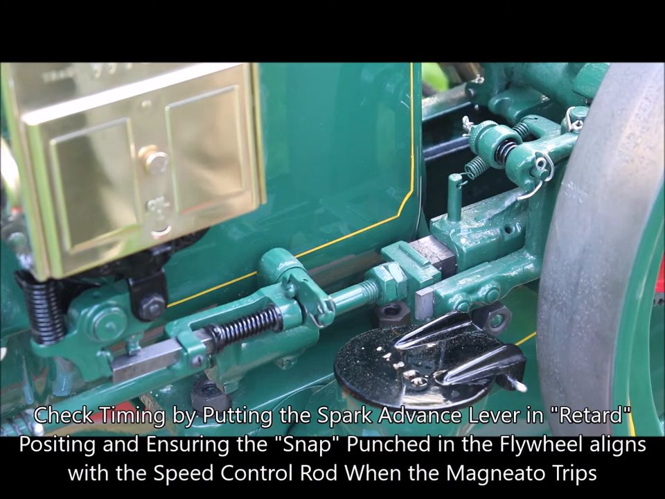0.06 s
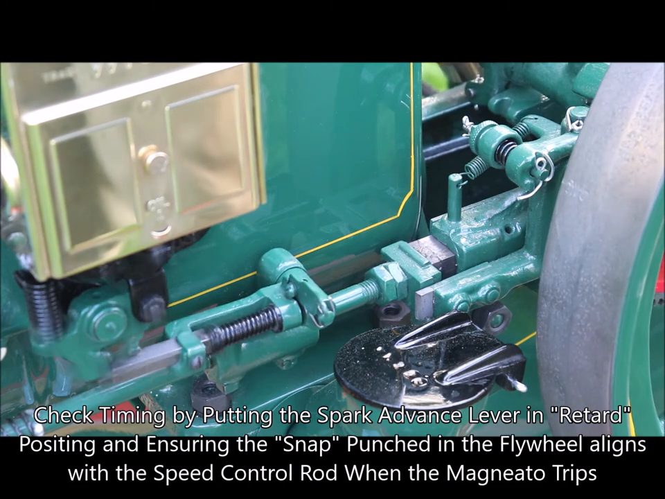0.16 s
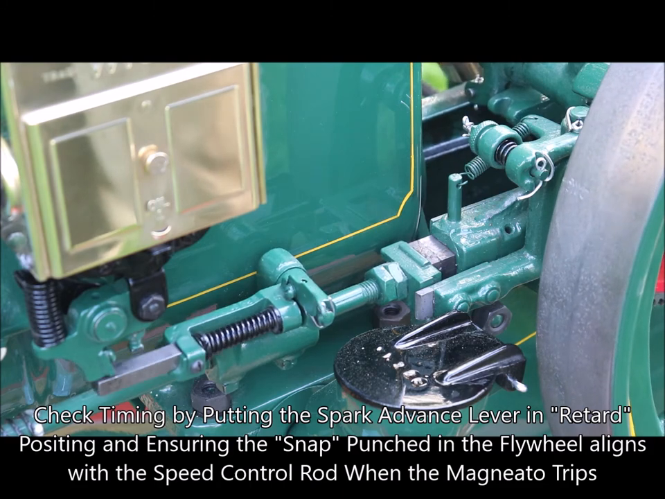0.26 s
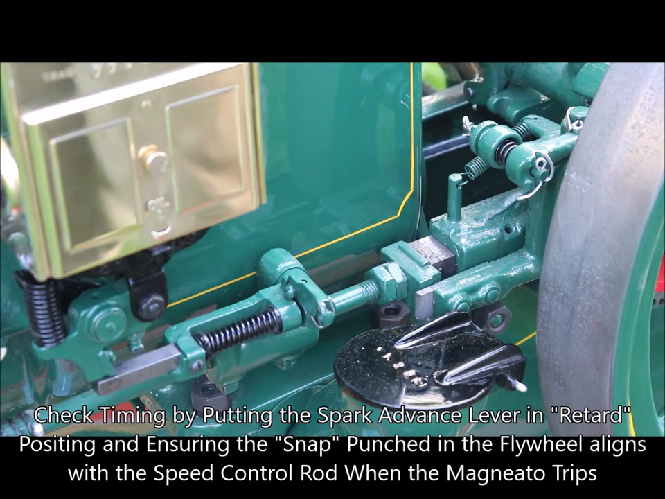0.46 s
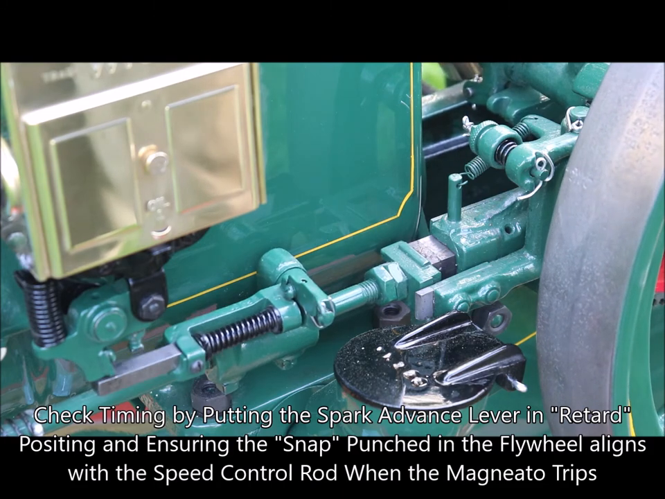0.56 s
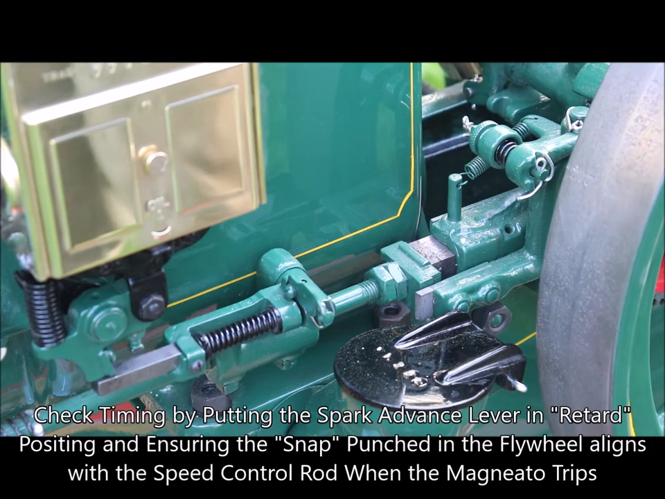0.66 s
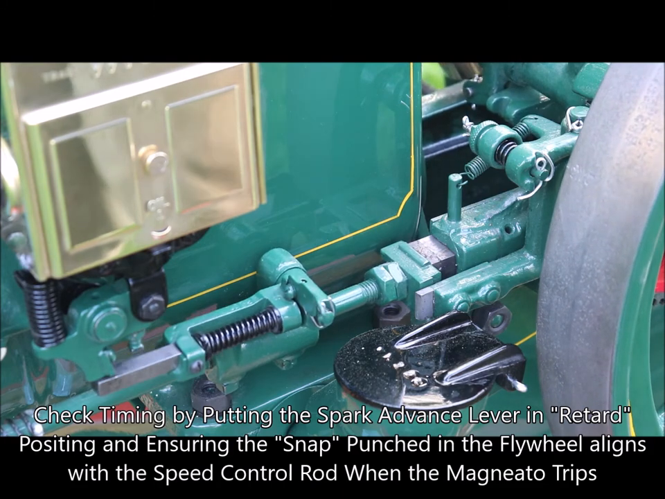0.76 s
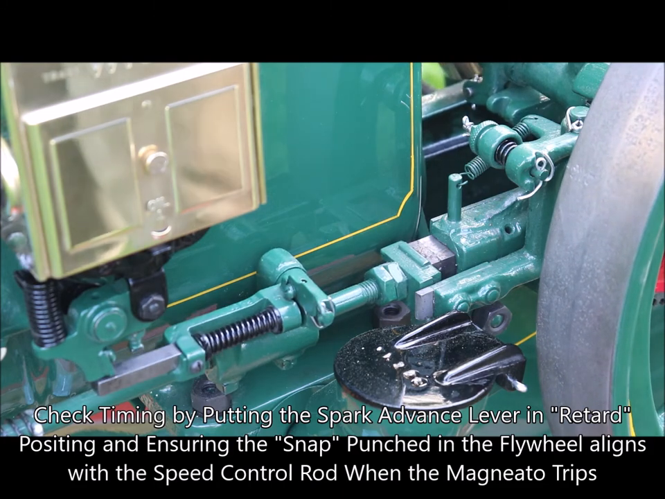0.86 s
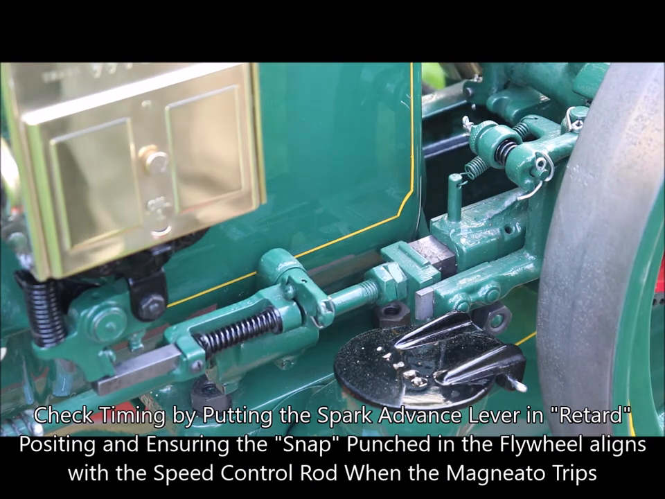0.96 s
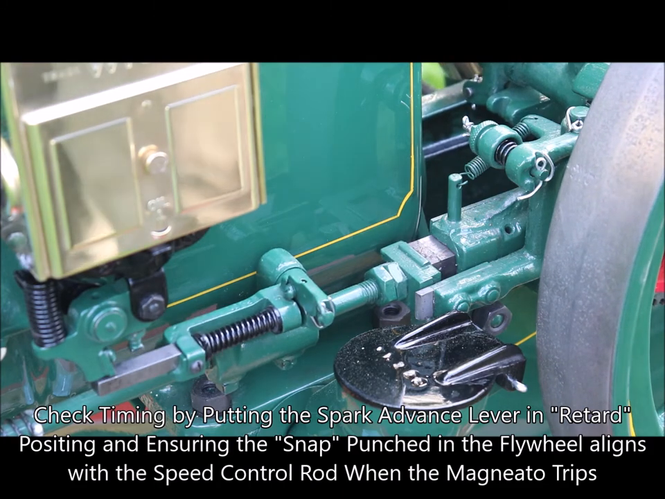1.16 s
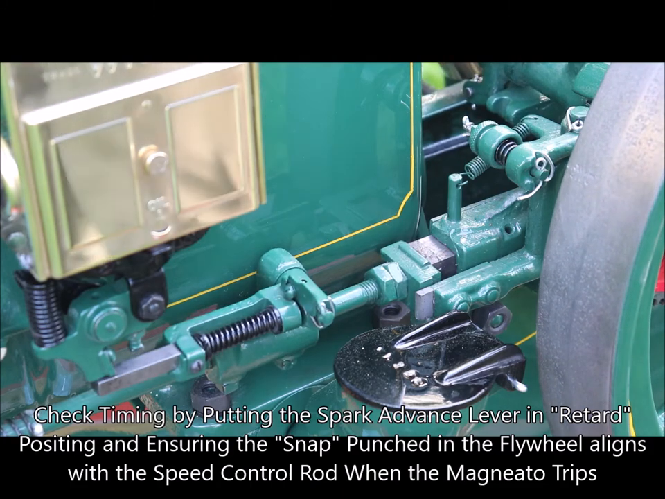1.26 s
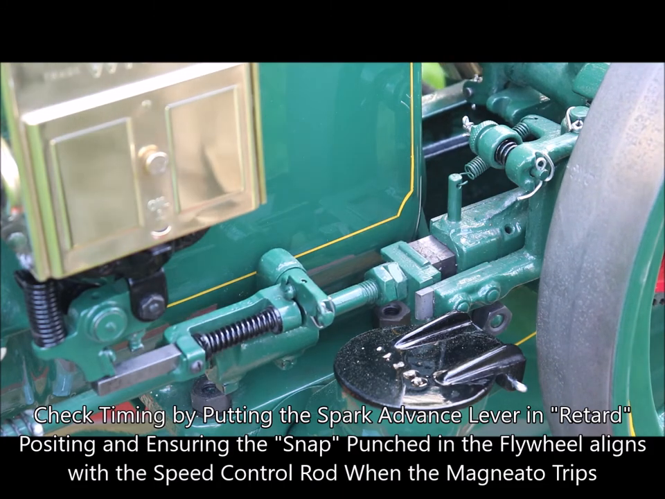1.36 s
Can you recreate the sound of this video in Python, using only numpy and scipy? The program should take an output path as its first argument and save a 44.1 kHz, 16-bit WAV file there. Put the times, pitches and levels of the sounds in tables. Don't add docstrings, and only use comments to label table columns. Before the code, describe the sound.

Sharp steel snap of a sprung engine ignition trip, heavy thud beneath, brief ring dying into quiet air

```python
import sys
import numpy as np
from scipy import signal
from scipy.fft import rfft, irfft, next_fast_len
from scipy.io import wavfile
from scipy.ndimage import uniform_filter1d, map_coordinates

SR = 44100
rng = np.random.default_rng(int(sys.argv[2]) if len(sys.argv) > 2 else 0)


def nominal_scale(level):
    x = np.asarray(level, float) / 20
    return 10 ** x


def master_out(mix):
    frames = np.transpose(np.atleast_2d(mix))
    ceiling = np.clip(frames, -1, 1)
    pcm = np.round(ceiling * 32767).astype(np.int16)
    wavfile.write(sys.argv[1], SR, pcm)


N = 61739
SIDES = np.array([[1], [-1]])


def unit(x):
    return x / np.sqrt(np.mean(x ** 2) + 1e-20)


def along(points, hz):
    f, v = np.transpose(points)
    return np.interp(np.log(hz + 1), np.log(f + 1), v)


def wobble(rate):
    return map_coordinates(rng.standard_normal(int(N * rate / SR) + 4), [np.arange(N) * rate / SR])


def filtered(x, response):
    m = next_fast_len(N + SR // 2)
    return irfft(rfft(x, m) * response(np.fft.rfftfreq(m, 1 / SR)), m)[..., :N]


def rush(gain, alike, patchy_db):
    z = signal.stft(rng.standard_normal((2, N)), nperseg=512)[2]
    field = uniform_filter1d(rng.standard_normal(z.shape[1:]), size=6, axis=0)
    field = uniform_filter1d(field, size=10, axis=1)
    pair = signal.istft(z * nominal_scale(patchy_db * unit(field)), nperseg=512)[1][:, :N]

    def mid_side_gain(hz):
        turn = np.arccos(np.clip(along(alike, hz), -1, 1)) / 2
        return gain(hz) * [np.cos(turn), np.sin(turn)]

    mid, side = filtered(pair, mid_side_gain)
    return unit(np.array([mid + side, mid - side]))


def tail(t60s, rise_s):
    hz, t, z = signal.stft(rng.standard_normal((2, SR // 2)), SR, nperseg=128)
    wide = (hz / (hz + 1500))[:, None]
    z = np.array([z[0] + wide * z[1], z[0] - wide * z[1]]) / np.sqrt(1 + wide ** 2)
    envelope = nominal_scale(-60 * t / along(t60s, hz)[:, None]) * (1 - np.exp(-t / rise_s))
    decay = signal.istft(z * envelope, SR, nperseg=128)[1]
    return decay / np.linalg.norm(decay[0])


def air():
    # f/Hz, level/dB per Hz
    floor_tone = [(15, -67), (25, -18.5), (102, -3), (166, -14.5), (242, -12.5), (270, -15.5), (641, -15),
                  (1260, -22.5), (16000, -42)]
    # f/Hz, left-right likeness
    floor_alike = [(60, .97), (240, .9), (950, .5), (3800, .25), (15000, .25)]
    # f/Hz, width/Hz, level/dB
    drones = [
        (104, 22, -61.5),
        (246, 58, -60),
    ]
    out = nominal_scale(-50.5 + .7 * wobble(8.9)) * rush(lambda hz: nominal_scale(along(floor_tone, hz)), floor_alike, patchy_db=1.4)
    for hz, width_hz, db in drones:
        drone = rush(lambda f: 1 / (1 + (2 * (f - hz) / width_hz) ** 2), [(100, 0.82)], patchy_db=1.2)
        out = out + nominal_scale(db + 1.8 * wobble(5.5)) * drone
    return out


def rustle():
    # t/s, level/dB, fizz over body/dB
    strokes = [
        (0.551, -78.5, 19),
        (.66, -61, -6),
        (.72, -69, -2),
        (.98, -65.5, 2),
        (1.06, -53.5, -6.5),
        (1.15, -54, -1.5),
        (1.21, -60, -2),
        (1.27, -58, -0.5),
        (1.4, -55.5, 1),
    ]
    # f/Hz, level/dB
    body_tone = [(500, -8.5), (900, -11), (2500, -5), (3500, -12.5), (6000, -31)]
    fizz_tone = [(2500, -15), (4200, -0.5), (5000, 0), (9000, -0.5), (11000, -6.5), (13000, -21)]
    pan_db, lag_s, body_db = -4.5, .00016, -4
    s, db, over_db = np.transpose(strokes)
    t = np.arange(N) / SR
    level_db, fizz_db = np.interp(t, s, db), np.interp(t, s, over_db)
    alike = [(1000, 0.82), (8000, 0.28)]
    body = rush(lambda hz: nominal_scale(along(body_tone, hz)), alike, patchy_db=0.8)
    fizz = rush(lambda hz: nominal_scale(along(fizz_tone, hz)), alike, patchy_db=0.8)
    rub = nominal_scale(level_db + wobble(30)) * (nominal_scale(body_db - fizz_db) * body + nominal_scale(fizz_db / 2) * fizz)
    return filtered(rub, lambda f: nominal_scale(pan_db * SIDES / 2) * np.exp(-1j * np.pi * f * lag_s * SIDES))


def yard(x):
    # f/Hz, t60/s
    wall_t60 = [(200, 0.29), (1500, 0.37), (5000, 0.32), (12000, 0.11)]
    near_t60 = [(300, 0.388), (1200, 0.38), (3000, 0.22), (12000, 0.076)]
    # f/Hz, level/dB
    echo_tone = [(150, -16), (400, 1.5), (3000, -1.5), (8000, -7.5), (15000, -27)]
    echo_s, echo_rise_s = .09, .07
    near_db, echo_db = -14.5, -26.5
    mono = x.mean(0)
    near = signal.fftconvolve(mono[None], tail(near_t60, rise_s=0.001), axes=1)[:, :N]
    late = np.pad(mono, (round(echo_s * SR), 0))
    far = signal.fftconvolve(late[None], tail(wall_t60, echo_rise_s), axes=1)[:, :N]
    return nominal_scale(near_db) * near + nominal_scale(echo_db) * filtered(far, lambda hz: nominal_scale(along(echo_tone, hz)))


def frame():
    # f/Hz, level/dB, t60/s
    hum_modes = [(230.6, -23, 0.23), (254.6, -27, 0.66), (326, -27.5, 0.25), (354.5, -37, 0.6),
                 (379.7, -32, 0.65), (434, -38.5, 0.42), (554, -41.5, 0.63), (725, -37, 0.26),
                 (938.3, -49.5, 0.74), (1446, -42, 0.35), (1626, -53, 1.46), (1780, -52.5, 1.1),
                 (3040, -53, 1.9), (3130, -51, 0.73)]
    # f/Hz, level/dB, t60/s
    thud_modes = [
        (240, -31, 0.11),
        (323, -21.5, 0.034),
        (471, -23.5, 0.031),
    ]
    strike_s, rise_s, thud_s = .228, 0.029, .2215
    t = np.clip(np.arange(N) / SR - strike_s, 0, None)
    since_thud = np.clip(np.arange(N) / SR - thud_s, 0, None)
    out = np.zeros((2, N))
    for hz, db, t60 in thud_modes:
        out += nominal_scale(db - 60 * since_thud / t60) * np.sin(2 * np.pi * hz * since_thud)
    for hz, db, t60 in hum_modes:
        uneven_db = 3.5 * wobble(20)
        drift = .045 * (hz / 400) ** .3 * wobble(30)
        shake = nominal_scale(db + uneven_db - 60 * t / t60) * (1 - np.exp(-t / rise_s))
        apart = hz / 5000 * rng.normal() * SIDES
        out += shake * np.sin(2 * np.pi * (hz * t + rng.random() + drift) + apart)
    return filtered(out, lambda f: (1j * f / (130 + 1j * f)) ** 3)


def trip():
    # t/s, level/dB, brightness/dB per octave, fullness below the knee/dB
    contacts = [(.2208, -31, -9, -18), (.2219, -12, -3, 6.5), (.2233, -12.5, 1.5, 4), (.2243, -9, 1.5, -11),
                (.2256, -12.5, -3.5, 0), (.2295, -14, 6.5, -3), (0.2299, -16.5, 7, -6),
                (.2337, -31.5, 9, -8), (.2358, -21.5, 5.5, 6), (.2484, -10, 3, -6),
                (.2491, -10.5, -4.5, -14.5), (.2525, -16.5, 5, 3.5), (.2594, -17, 5, -1),
                (0.2614, -10, 0.5, -5.5), (.2630, -14.5, 3.5, 1.5), (0.265, -14, -8.5, -6),
                (.2685, -20.5, -8, 4.5), (.2735, -24, 0.5, -11), (.2780, -19.5, -6, -1.5),
                (.2850, -46, 8.5, -4), (.5670, -47, -1, -6.5), (.5900, -49.5, 3, -14)]
    # f/Hz, level/dB, t60/s
    steel = [(661, -10.5, .012), (726.6, -12.5, 0.032), (1337, -5.5, 0.056), (1545, -1.5, 0.017),
             (2160, -13, 0.013), (2393, -5, 0.05), (2596, -0.5, .015), (3513, -4, 0.018),
             (5030, -8.5, 0.0075), (6230, -8, 0.011), (7540, -15, 0.021), (8660, -15, 0.019),
             (10640, -15.5, 0.013), (13600, -8.5, 0.004)]
    # f/Hz, level/dB
    crack_tone = [(200, -14), (600, 3.5), (1400, 2), (2600, 1), (4500, -4), (8000, -4.5), (11000, -13.5),
                  (15000, -14)]
    knee_hz, pivot_hz = 1800, 2500
    crack_db, crack_t60_s = 5.5, 0.0086
    rattle_db, rattle_t60_s, rattle_top_hz = -2.5, .06, 4500
    headroom_db, pan_db, lag_s = -4, -1, .000022
    out = np.zeros((2, 2, N + SR))
    t = np.arange(8192) / SR
    f = np.fft.rfftfreq(len(t), 1 / SR)
    hz, level_db, t60 = np.transpose(steel)[:, :, None]
    for s, db, tilt_db, full_db in contacts:
        def shade(v):
            bright = tilt_db * np.log2(np.maximum(v, knee_hz) / pivot_hz)
            return bright + full_db / (1 + (v / knee_hz) ** 4)

        level_draw, side_draw, pitch_draw, phase_draw = rng.standard_normal((4, len(steel), 1))
        spread = np.clip(hz / 7000, 0, 1.2) * side_draw * SIDES[:, None]
        phase = 2 * np.pi * hz * (1 + .012 * pitch_draw) * t + spread + .6 * phase_draw
        ring = nominal_scale(level_db + shade(hz) + 2 * level_draw - 60 * t / t60) * np.sin(phase)

        noise = rng.standard_normal((2, len(t)))
        width = [1 + 0 * f, f / (f + 2500)]
        mid, side = irfft(rfft(noise) * nominal_scale(along(crack_tone, f) + shade(f)) * width)
        spit = mid + .9 * SIDES * side
        dull = irfft(rfft(spit) / (1 + (f / rattle_top_hz) ** 2))
        crack = spit * nominal_scale(crack_db - 60 * t / crack_t60_s)
        rattle = dull * nominal_scale(rattle_db - 60 * t / rattle_t60_s)

        hit = np.array([ring.sum(1), crack + rattle]) * (1 - np.exp(-t / 0.0001))
        out[..., round(s * SR):][..., :len(t)] += nominal_scale(db + headroom_db + pan_db * SIDES / 2) * hit
    return filtered(out[..., :N], lambda f: (1j * f / (250 + 1j * f)) ** 3 * np.exp(1j * np.pi * f * lag_s * SIDES))


def scene():
    (ring, crack), hum = trip(), frame()
    return ring + crack + hum + yard(crack + 0.26 * ring + 3.54 * hum) + air() + rustle()


def low_pass(x):
    return signal.sosfilt(signal.butter(12, 16610, fs=SR, output="sos"), x)


def record(dry):
    duck_db, duck_from_s, duck_in_s, duck_back_s = -2.5, .27, 0.022, 0.047
    ceiling, top_hz = 1.05, 15850
    t = np.arange(N) / SR - duck_from_s
    duck = np.exp(-np.clip(t, 0, None) / duck_back_s) * np.clip(1 + t / duck_in_s, 0, 1)
    x = dry * nominal_scale(duck_db * duck)
    x = x / (1 + np.abs(x / ceiling) ** 8) ** .125
    x = filtered(x, lambda f: 1 / (1 + (f / top_hz) ** 120))
    return low_pass(x)


dry = scene()
out = record(dry)
master_out(out)
```